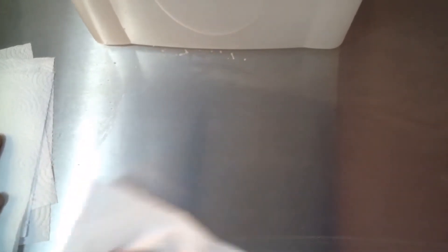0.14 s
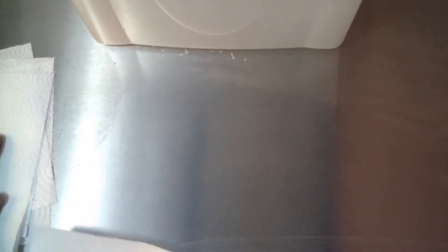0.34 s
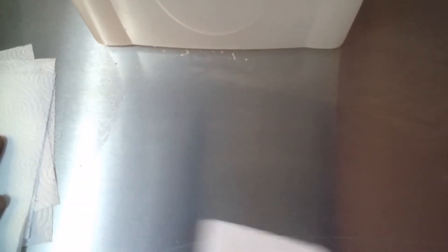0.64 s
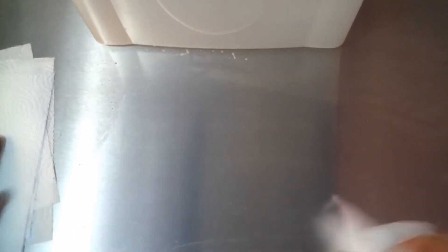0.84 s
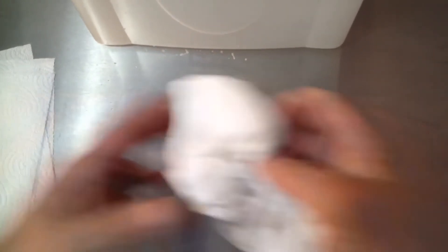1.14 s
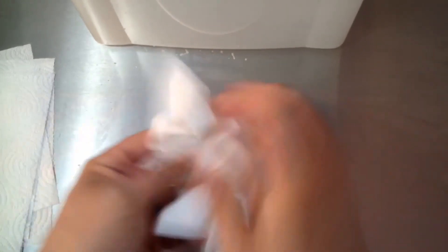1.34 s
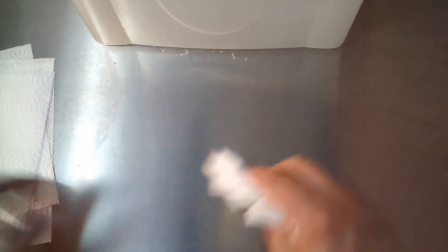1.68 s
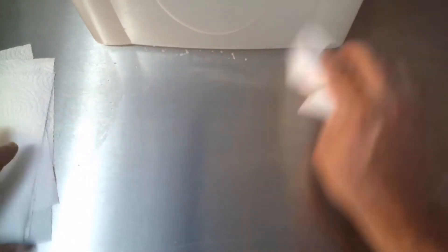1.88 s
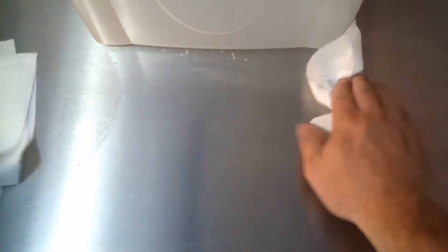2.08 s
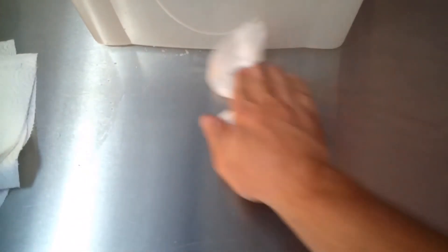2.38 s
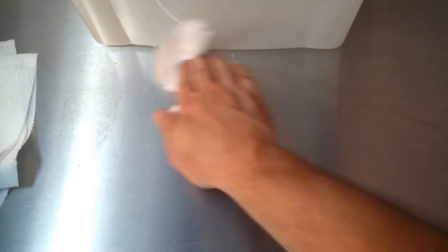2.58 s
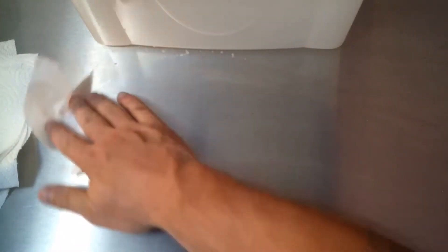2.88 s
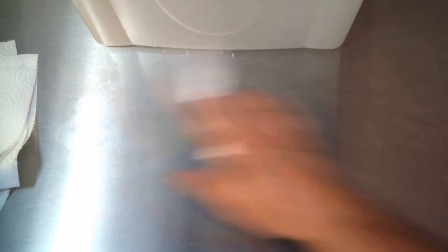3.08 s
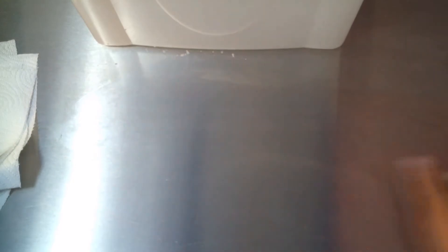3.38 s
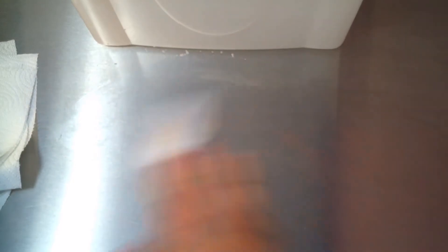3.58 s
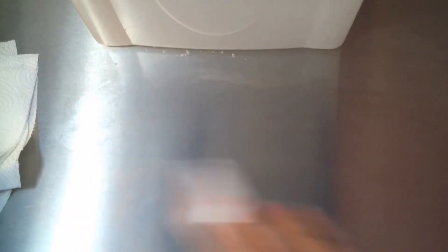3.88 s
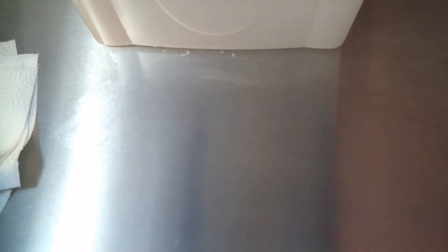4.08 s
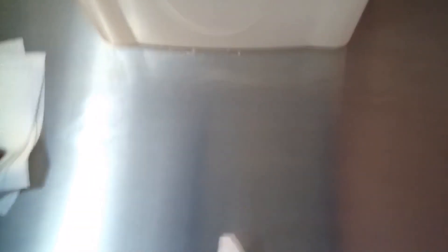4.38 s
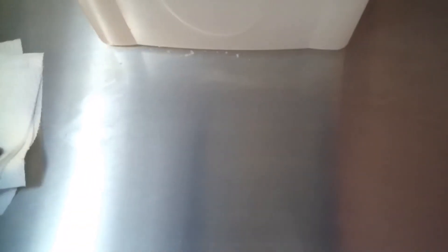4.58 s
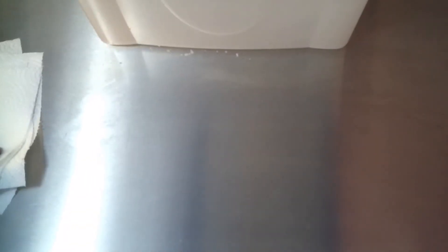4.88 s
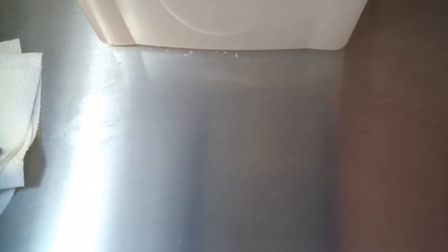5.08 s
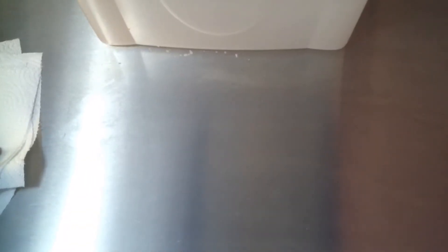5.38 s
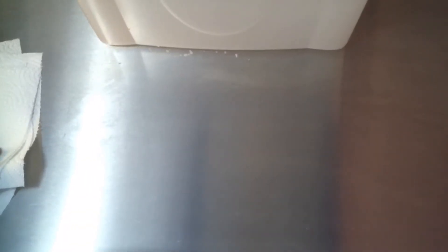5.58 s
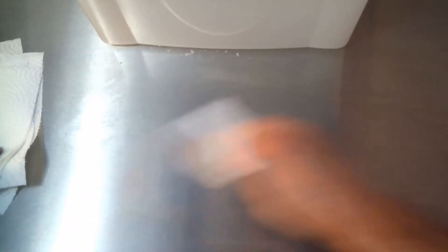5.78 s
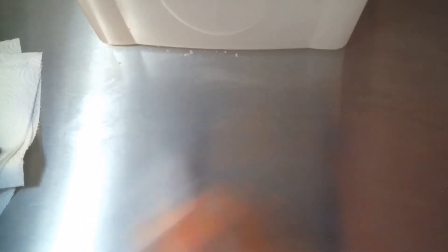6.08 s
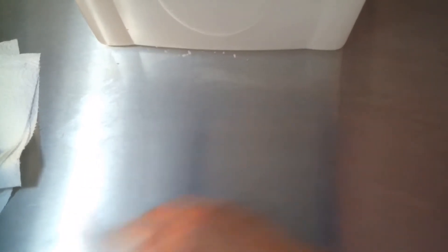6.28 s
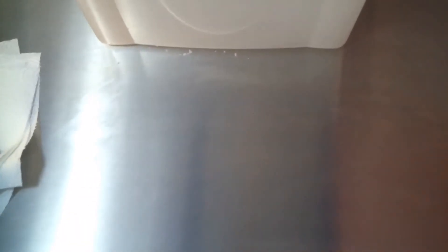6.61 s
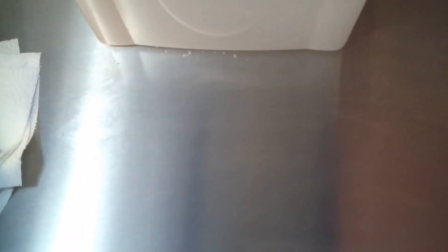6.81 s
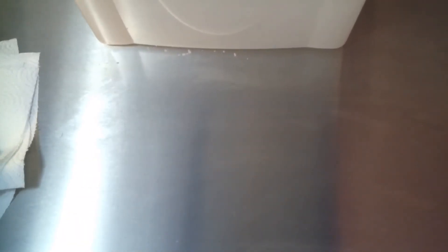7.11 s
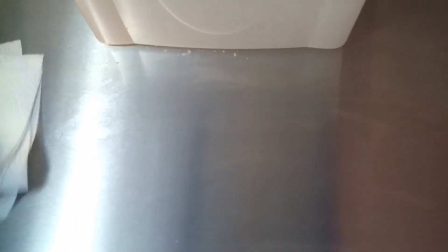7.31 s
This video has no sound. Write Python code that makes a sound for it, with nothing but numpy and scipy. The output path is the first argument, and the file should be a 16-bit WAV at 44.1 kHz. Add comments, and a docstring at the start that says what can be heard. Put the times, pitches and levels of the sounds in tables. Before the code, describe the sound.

A paper towel brushes a steel worktop, is crumpled with crisp crackles, then pats down and wipes in quick back-and-forth hissing strokes. Midway a cluster of hard, loud clacks rattles the steel, followed by softer wiping and two duller bumps. Close, small hissy mono microphone in a small hard-walled room with faint air murmur.

```python
"""Paper towel on a steel worktop

A paper towel is crumpled into a wad and wiped over stainless steel in a small room: clumps of tiny clicks.
The hand pats and bumps the top, and something hard clatters close by: noise bursts, steel modes and snaps.
Friction noise rings in the hollow under the hand, and the room answers over a low murmur of air.
A small mono microphone, whose port rings near 7 kHz, gives everything a hissy sheen."""
import sys
import numpy as np
from scipy import signal
from scipy.fft import rfft, irfft, next_fast_len
from scipy.io import wavfile

SR = 44100
rng = np.random.default_rng(int(sys.argv[2]) if len(sys.argv) > 2 else 0)


def store_pcm(level_fs):
    """Save levels as 16-bit WAV."""
    pcm = np.round(np.clip(level_fs, -1, 1) * 32767).astype(np.int16)
    wavfile.write(sys.argv[1], SR, np.atleast_2d(pcm).T)


N = 328545
TIME = np.arange(N) / SR


def amp(db):
    """Decibels to gain."""
    return 10 ** (np.asarray(db) / 20)


def unit(x):
    """Scales to an rms of one."""
    return x / np.sqrt(np.mean(x ** 2) + 1e-20)


def read(points, hz):
    """Reads a table along a logarithmic frequency axis."""
    f, value = np.transpose(points)
    return np.interp(np.log(hz + 1), np.log(f + 1), value)


def colour(x, points, tilt_db=0):
    """Gives x a spectrum, tilted by some dB an octave above 200 Hz, at unit rms."""
    size = next_fast_len(len(x))
    hz = np.fft.rfftfreq(size, 1 / SR)
    octaves = np.log2(np.maximum(hz, 200) / 1000)
    gain = amp(read(points, hz) + tilt_db * octaves)
    return unit(irfft(rfft(x, size) * gain, size)[:len(x)])


def add(mix, s, sound):
    """Mixes a sound in at time s."""
    part = mix[max(round(s * SR), 0):][:len(sound)]
    part += sound[:len(part)]


def waver(hz):
    """Slow random drift of unit rms, fading out above the given rate."""
    f = np.fft.rfftfreq(N, 1 / SR)
    return unit(irfft(rfft(rng.standard_normal(N)) / (1 + (f / hz) ** 4), N))


def slips(per_s, spread_db):
    """Fibres catching and letting go: random tiny clicks, a few of them large."""
    size = amp(spread_db * np.minimum(rng.exponential(1, N), 5))
    sign = rng.choice([-1, 1], N)
    happens = rng.random(N) < per_s / SR
    return unit(size * sign * happens)


def resonate(x, hz, width):
    """Shifts the curve hz down to zero, smooths twice, and shifts back: a moving resonance."""
    turn = np.exp(2j * np.pi * np.cumsum(hz) / SR)
    r = np.exp(-np.pi * width / SR)
    smoothed = signal.lfilter([1], [1, -2 * r, r * r], x / turn)
    return unit((turn * smoothed).real)


def shifting(x, patchy_db, patch_hz, patch_s, size=512):
    """As folds and contact points move, small resonances come and go in the spectrum."""
    hop = size // 4
    z = signal.stft(x, SR, nperseg=size, noverlap=size - hop)[2]
    across = np.fft.fftfreq(z.shape[0], SR / size)[:, None]
    along = np.fft.rfftfreq(z.shape[1], hop / SR)
    smooth = np.exp(-(across * patch_hz) ** 2 - (along * patch_s) ** 2)
    patches = unit(np.fft.irfft2(np.fft.rfft2(rng.standard_normal(z.shape)) * smooth, z.shape))
    z = z * unit(amp(patchy_db * patches))
    return signal.istft(z, SR, nperseg=size, noverlap=size - hop)[1][:N]


def air():
    """The room's low steady murmur of air, as coloured noise."""
    # Spectrum of the murmur. Each row: frequency in Hz, relative level in dB.
    murmur_colour = [(20, -1.5), (60, 1), (150, 1), (320, -2), (700, -8.5), (1500, -15), (3500, -16.5),
                     (7000, -28), (15000, -17.5)]
    return amp(-61.0) * colour(rng.standard_normal(N), murmur_colour)


def room(x):
    """Diffuse reflections off hard walls: a noise tail that dies at its own rate in each band, bass slowest."""
    # How long the room rings. Each row: frequency in Hz, time to fall by 60 dB in seconds.
    room_t60 = [(100, 0.51), (1000, 0.33), (4000, 0.3), (12000, 0.38)]
    hz, t, z = signal.stft(rng.standard_normal(SR // 2), SR, nperseg=256)
    decay = amp(-60 * t / read(room_t60, hz)[:, None])
    tail = signal.istft(z * decay, SR, nperseg=256)[1]
    tail *= TIME[:len(tail)] > .004  # the nearest wall answers after 4 ms
    return signal.fftconvolve(x, tail / np.linalg.norm(tail))[:N]


def blows():
    """Each blow lands twice, setting off a dense clatter and clearer steel modes, over one low frame thump."""
    # Bumps and clatter on and beside the worktop. Each row: time in seconds, relative clatter level in dB,
    # relative thump level in dB, brightness in dB per octave, time to fall by 60 dB in seconds,
    # second contact in dB relative to the first.
    blow_list = [(4.125, -62.5, -56, -5, 0.32, -11), (4.438, -33, -41, -2.5, 0.19, 0),
                 (4.476, -38, -56, 0, 0.32, -8), (4.514, -36.5, -51, 4.5, 0.18, -7),
                 (4.528, -29, -38.5, -.5, .18, -12), (4.549, -38, -52, -0.5, 0.2, -13),
                 (4.599, -57, -58, 3, 0.16, -15), (5.028, -65, -50.5, 4, .25, -8),
                 (6.107, -45.5, -41.5, 1.5, 0.18, -1.5), (6.727, -46.5, -37.5, -0.5, 0.2, 4)]
    # What the struck steel rings with. Each row: frequency in Hz, relative level in dB,
    # time to fall by 60 dB in seconds.
    steel_modes = [(299, 10, 0.27), (533, -2.5, 0.27), (1244, -8, 0.46), (1415, -7, 0.5), (1800, -3, 0.29),
                   (2054, -1, 0.15), (2134, 6, 0.17), (2255, -7, 0.16), (2590, 2, 0.2), (3070, 7.5, 0.13),
                   (3380, 0, 0.17), (3380, -18, 0.19), (3600, -18, 0.15), (3940, 1, 0.2), (4050, -2, 0.21)]
    # Spectrum of the clatter. Each row: frequency in Hz, relative level in dB.
    clatter_colour = [(50, -3), (190, -13), (300, -8), (600, 4), (850, -2.5), (1400, 1), (2200, 0.5),
                      (2800, -4.5), (3300, -2.5), (5000, -9), (7000, -11), (10000, -16), (15000, -23)]
    # The frame's thump, a low hump near its rocking frequency. Each row: frequency in Hz, relative level in dB.
    thump_colour = [(20, -14.5), (42, 1), (64, 3), (100, -8), (140, -3.5), (190, -14.5), (300, -9),
                    (600, -25.5), (3000, -51)]
    second_contact_s = .013  # one edge lands first, the rest just after
    out, t = np.zeros(N), TIME[:SR // 2]
    hz, mode_db, mode_t60 = np.transpose(steel_modes)[:, :, None]
    chatter = amp(1.37 * waver(hz=350))  # loose parts touch again and again
    rise = 1 - np.exp(-t / 0.0013)
    for s, clatter_db, thump_db, tilt_db, t60, second_db in blow_list:
        decay = amp(-60 * t / t60)
        thump = colour(rng.standard_normal(len(t)), thump_colour) * decay
        add(out, s, amp(thump_db) * thump * rise)
        for delay, force in (0, 1), (second_contact_s, amp(second_db)):
            phase = 2 * np.pi * rng.random(hz.shape)  # the spot that is struck varies
            modes = amp(mode_db - 60 * t / mode_t60) * np.sin(2 * np.pi * hz * t + phase)
            rattle = colour(rng.standard_normal(len(t)), clatter_colour, tilt_db) * decay
            clatter = rattle + amp(-16.5) * modes.sum(0)
            add(out, s + delay, force * amp(clatter_db) * clatter * rise)
    return out * chatter


def snaps(size=512):
    """Each snap is one impulse, coloured by the edge that gives way; all of its ring comes after it."""
    # Sharp snaps of paper creases and hard edges. Each row: time in seconds, level in dB,
    # sharpness in dB per octave (reached well above 1 kHz).
    snap_list = [(.777, -36, 12), (.987, -35, 3), (1.258, -38, 7), (1.275, -29, 1), (1.293, -36, -1),
                 (1.331, -28, -8), (1.908, -45, 0), (4.446, -20, 2), (4.448, -1.5, 1), (4.4498, -19, -6),
                 (4.4784, -12.5, -5), (4.5156, -12.5, -4), (4.5319, -8, -4), (4.5578, -10, -2),
                 (4.708, -31, -10), (4.806, -36, -2.5), (7.361, -33.5, 0)]
    # Spectrum of a snap. Each row: frequency in Hz, relative level in dB.
    snap_colour = [(100, -10), (650, -3.5), (1500, -6), (2200, 7), (2800, -4), (3300, 9.5), (4800, -15),
                   (7000, -3.5), (8000, -7), (10000, -37), (15000, -31)]
    out, hz = np.zeros(N), abs(np.fft.fftfreq(size, 1 / SR))
    for s, db, tilt_db in snap_list:
        log_gain = np.log(amp(read(snap_colour, hz) + tilt_db * np.log2(hz / 1000 + 1)))
        spectrum = np.exp(np.conj(signal.hilbert(log_gain)))  # minimum phase
        pulse = np.fft.ifft(spectrum).real
        add(out, s, amp(db) * pulse / np.linalg.norm(pulse))
    return out


def pats():
    """The wad cushions the hand, so the top answers with a dull, papery thud."""
    # Fingers and palm pressing the wad shut or landing on it. Each row: time in seconds, level in dB.
    pat_list = [(1.272, -53), (1.304, -55), (1.615, -50.5), (2.128, -50), (2.141, -48), (2.17, -45.5),
                (2.196, -52)]
    # Spectrum of a cushioned pat. Each row: frequency in Hz, relative level in dB.
    pat_colour = [(30, -8), (80, -1), (130, 11), (250, -1), (520, -3), (750, 0.5), (1100, -2), (1300, -8),
                  (2500, -12.5), (7000, -30), (15000, -35)]
    t60_s = 0.22
    out, t = np.zeros(N), TIME[:SR // 2]
    for s, db in pat_list:
        thud = colour(rng.standard_normal(len(t)), pat_colour)
        add(out, s, amp(db - 60 * t / t60_s) * thud)
    return out


def gesture(start, length, change_db, attack_s, release_s, arch_db):
    """Gain over time of one hand movement: a soft start, an arched and sloping hold, and a release."""
    t = TIME - start
    along = np.clip(t / length, 0, 1)
    attack = np.sin(np.pi / 2 * np.clip(t / attack_s, 0, 1))
    hold = amp(change_db * (along - .5) + arch_db * (np.sin(np.pi * along) - 1))
    return attack * hold * np.exp(-np.maximum(t - length, 0) / release_s)


def hand():
    """How strongly the towel glides, drags, is squeezed and is swung; overlapping gestures add in power."""
    # Strokes of the towel over the steel. Each row: start in seconds, length in seconds,
    # relative level of the light glide in dB, relative level of the pressed drag in dB,
    # gain in level from start to end in dB.
    strokes = [(-.04, 0.47, -52.5, -65.5, -10.5), (0.488, 0.57, -57.5, -81, 2), (2.0, 0.16, -59, -68, 4),
               (2.102, 0.12, -53.5, -59, 3), (2.219, 0.3, -46, -58, 0.5), (2.536, 0.4, -53, -62, 1.5),
               (2.754, .24, -44.5, -58.5, 2.5), (2.983, 0.1, -51.5, -59, -3), (3.081, .13, -45, -61, 6.5),
               (3.21, 0.19, -46.5, -62, 2.5), (3.426, 0.12, -46.5, -62.5, -4.5),
               (3.532, 0.23, -46, -60.5, 0.5), (3.76, 0.34, -53, -62.5, -4), (4.113, .1, -52, -65, 4.5),
               (4.23, .21, -53, -67, 5), (4.63, 0.13, -57, -72, -5), (4.77, 0.31, -58.5, -70.5, 0),
               (5.03, 0.32, -51.5, -81, 1), (5.37, 0.28, -55, -87, -0.5), (5.605, 0.35, -49.5, -70.5, 3),
               (6.012, 0.12, -49, -70, 8), (6.107, 0.14, -47.5, -62, -8), (6.293, .41, -50.5, -67, 2.5),
               (6.79, 0.23, -52, -68, -0.5), (7.01, 0.36, -62.5, -72, -13)]
    # Squeezes that fold the towel and close it into a wad. Each row: start in seconds, length in seconds,
    # relative level in dB, gain in level from start to end in dB.
    squeezes = [(0.75, 0.18, -54, 1.5), (.87, 0.15, -53, 4), (1.023, 0.059, -54, 4), (1.247, .06, -52.5, 3),
                (1.286, 0.098, -45.5, 1), (1.385, 0.087, -48.5, 3), (1.462, 0.094, -54.5, 9),
                (1.546, .125, -46, 2), (1.852, 0.062, -65, 0)]
    # The loose sheet swung through the air. Each row: start in seconds, length in seconds,
    # relative level in dB, gain in level from start to end in dB.
    wafts = [(-.06, 0.46, -62.5, -22), (5.498, 0.12, -62.5, 2)]
    glide, drag, squeeze, swing = np.zeros((4, N))
    for start, length, glide_db, drag_db, change_db in strokes:
        # the hand is fastest in mid-stroke
        power = gesture(start, length, change_db, attack_s=0.036, release_s=0.044, arch_db=1.5) ** 2
        glide += amp(glide_db) ** 2 * power
        drag += amp(drag_db) ** 2 * power
    for start, length, db, change_db in squeezes:
        # the grip is tightest in mid-squeeze
        grip = gesture(start, length, change_db, attack_s=.015, release_s=0.018, arch_db=5)
        squeeze += (amp(db) * grip) ** 2
    for start, length, db, change_db in wafts:
        sweep = gesture(start, length, change_db, attack_s=0.083, release_s=0.073, arch_db=-1)
        swing += (amp(db) * sweep) ** 2
    return np.sqrt([glide, drag, squeeze, swing])


def hollow(drag, squeeze, swing):
    """Friction noise rings in the pocket of air under the hand, whose pitch follows the grip."""
    # Pitch of the hollow as the grip changes. Each row: time in seconds, centre frequency in Hz.
    grip_pitch = [(0, 2000), (.3, 1800), (1.33, 1600), (2.2, 1420), (2.85, 1570), (3.85, 1620), (7, 1680)]
    pitch = np.interp(TIME, *np.transpose(grip_pitch))
    pitch = pitch * (1 + 0.028 * waver(hz=6.9))  # the fingers keep shifting
    leak = amp(1.5 * waver(hz=14))  # the pocket opens and closes
    drive = amp(-11.0) * drag + amp(-16) * squeeze + amp(-11) * swing
    return drive * leak * resonate(rng.standard_normal(N), pitch, width=400)


def crumpling(squeeze, swing):
    """Creases buckle in clumps as the sheet is squeezed; the loose sheet wafts softly."""
    # Spectrum of the buckling creases. Each row: frequency in Hz, relative level in dB.
    crease_colour = [(60, -9), (300, -1), (520, -3.5), (780, -1), (1700, -1.5), (3500, -1.5), (5000, -4),
                     (7000, -7.5), (10000, -8.5), (15000, -14.5)]
    # Spectrum of the loose sheet moving through the air. Each row: frequency in Hz, relative level in dB.
    loose_colour = [(100, -11), (350, -6), (520, -2), (700, -9.5), (1000, -13.5), (3000, -25), (15000, -46)]
    creases = colour(slips(per_s=7000, spread_db=2.0), crease_colour)
    clumps = amp(0.54 * waver(hz=69.6))
    waft = swing * colour(rng.standard_normal(N), loose_colour)
    return amp(-0.2) * squeeze * creases * clumps + waft


def wiping(glide, drag):
    """Fine fibres hiss as the wad glides; pressed down, it drags coarsely and stirs the steel."""
    # Spectrum of the light glide. Each row: frequency in Hz, relative level in dB.
    glide_colour = [(100, -13), (1000, -4), (2000, -12), (3200, -1), (5000, 0), (7000, 0.5), (8500, -0.5),
                    (11000, 0.5), (15000, -2)]
    # Spectrum of the pressed drag. Each row: frequency in Hz, relative level in dB.
    drag_colour = [(60, -3.5), (280, 5.5), (600, -3), (1150, -10.5), (1500, 1), (1950, -2), (2500, -0.5),
                   (4000, -5), (7000, -16), (14000, -24)]
    fine = glide * colour(slips(per_s=14000, spread_db=2.0), glide_colour)
    coarse = drag * colour(slips(per_s=4000, spread_db=2.0), drag_colour)
    unsteady = amp(0.47 * waver(hz=45))
    return (amp(-7.5) * fine + amp(1.0) * coarse) * unsteady


def scene():
    """Paper and blows in the room, over its low steady murmur of air; both channels are the same."""
    glide, drag, squeeze, swing = hand()
    rubbing = wiping(glide, drag) + crumpling(squeeze, swing)
    paper = shifting(rubbing, patchy_db=1.6, patch_hz=448, patch_s=0.077)
    paper = paper + hollow(drag, squeeze, swing)
    hits = shifting(pats() + blows(), patchy_db=3.0, patch_hz=454, patch_s=0.034) + snaps()
    reflections = room(amp(-10.0) * paper + amp(-10.5) * hits)
    mono = paper + hits + reflections + air()
    return np.array([mono, mono])


def record(dry):
    """The microphone port rings like a small bottle; preamplifier hiss and the band limit follow."""
    port_hz, port_width_hz = 6920, 720
    hiss_db, edge_hz = -64, 15720  # hiss level ahead of the band limit
    hz = np.fft.rfftfreq(N, 1 / SR)
    port = 1 / (1 - (hz / port_hz) ** 2 + 1j * hz * port_width_hz / port_hz ** 2)
    heard = irfft(rfft(dry) * port, N)
    heard = heard + amp(hiss_db) * rng.standard_normal(N)
    low_pass = signal.firwin(511, edge_hz, window=("kaiser", 9), fs=SR)
    return signal.oaconvolve(heard, low_pass[None], "same")


dry = scene()
out = record(dry)
store_pcm(out)
```